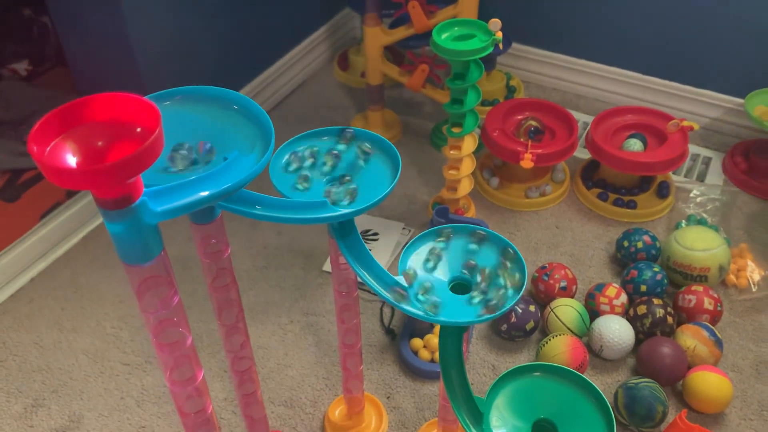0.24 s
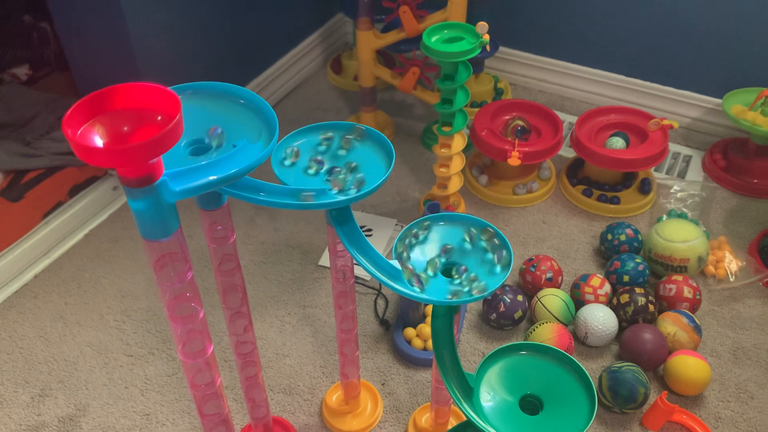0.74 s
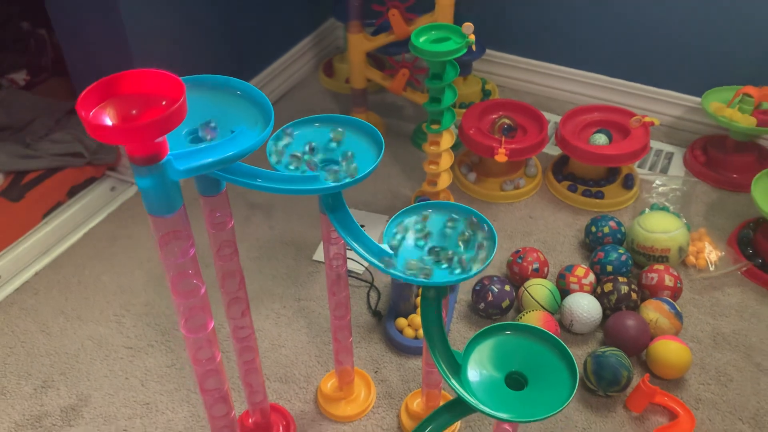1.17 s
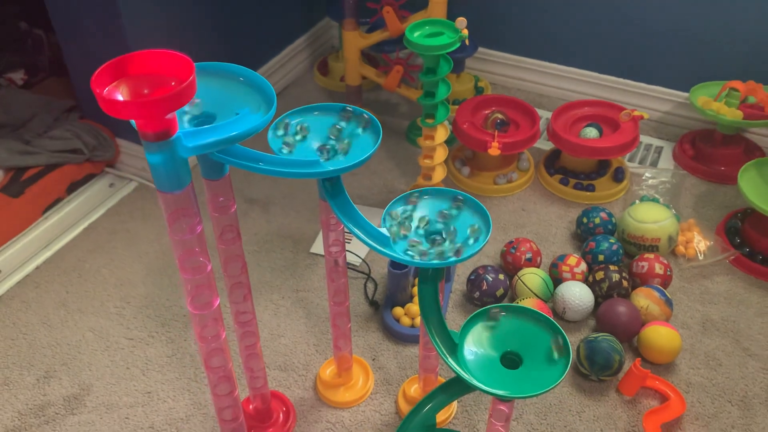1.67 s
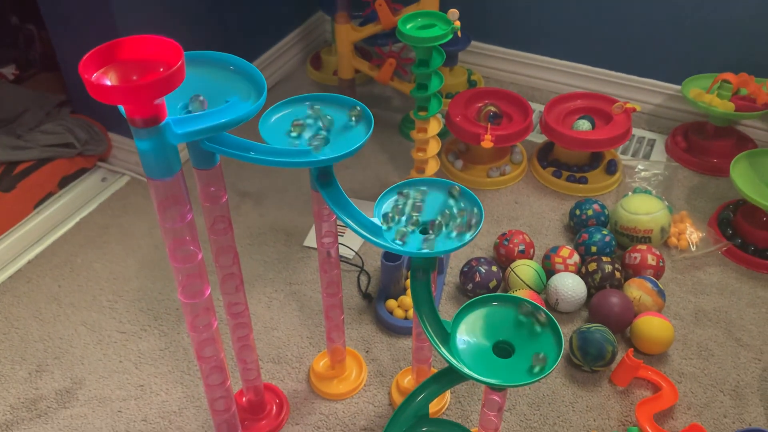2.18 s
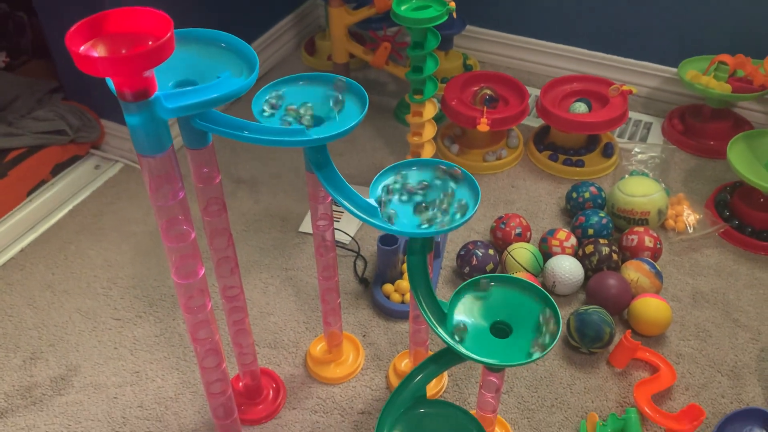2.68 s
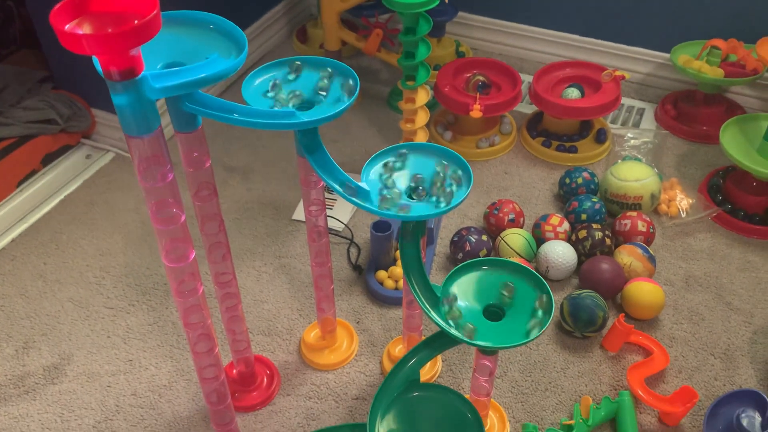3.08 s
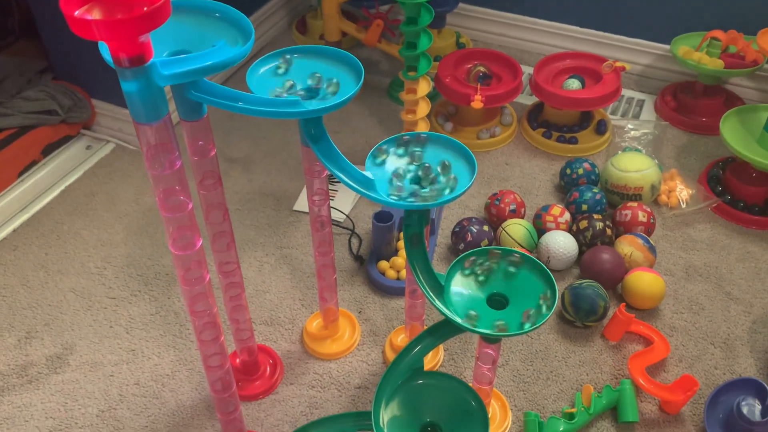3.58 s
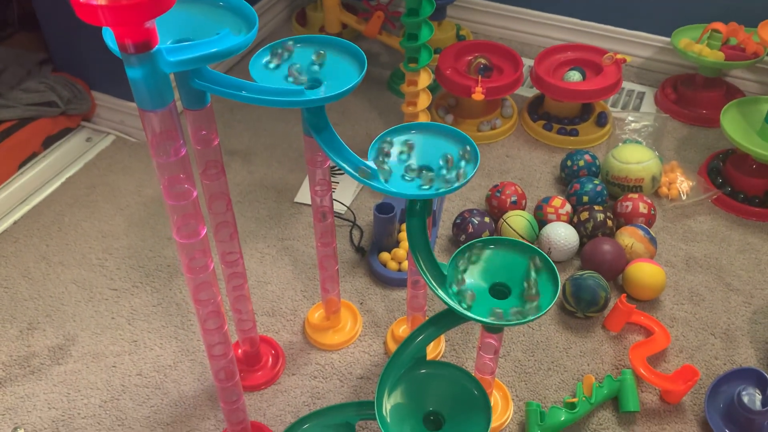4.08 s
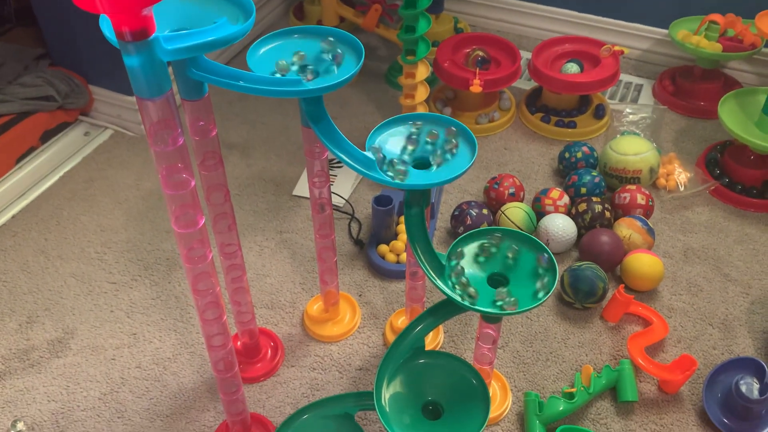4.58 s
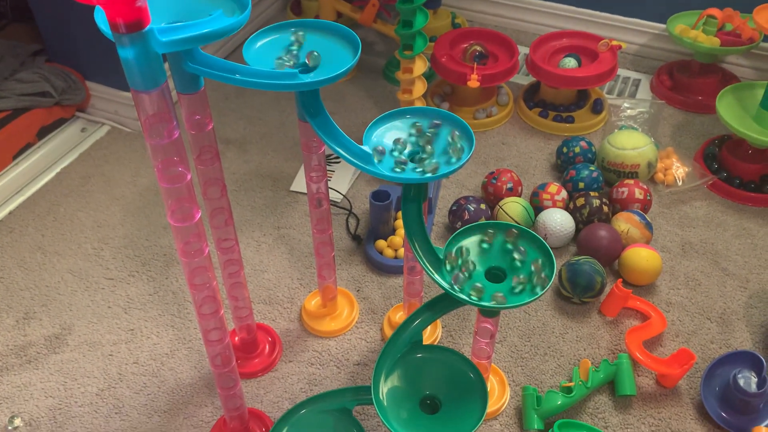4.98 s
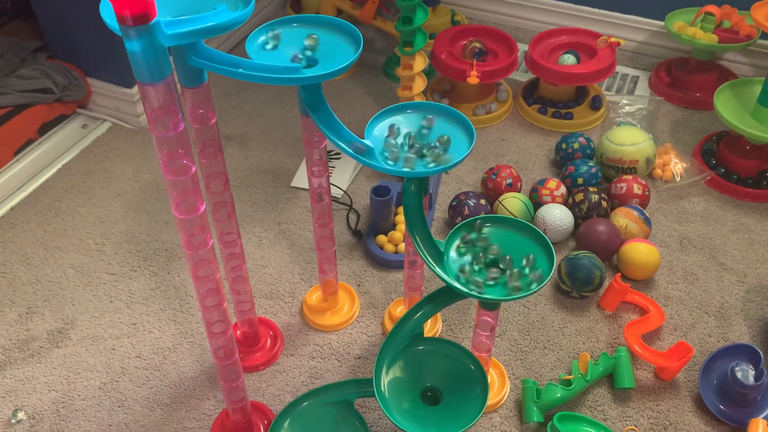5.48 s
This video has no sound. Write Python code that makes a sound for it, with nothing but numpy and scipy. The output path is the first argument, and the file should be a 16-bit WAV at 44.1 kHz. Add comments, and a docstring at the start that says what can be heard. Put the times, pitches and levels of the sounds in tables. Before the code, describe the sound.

A dense, bright clatter of glass marbles runs through a plastic toy track in a quiet carpeted room, heard from nearby. The marbles roll steadily around the funnels the whole time, ticking sharply against one another and striking the plastic with short, hollow knocks. The knocks come in uneven flurries, easing for a moment now and then while the rolling carries on. The sound is dry, with hardly any bass.

```python
"""Sharp clicks and hollow knocks over a steady rolling: glass marbles circle in the plastic funnels of a
toy track, drop from funnel to chute and strike each other. Rolling over ridges excites the plastic
as noise; each drop rings its damped modes and shoves neighbours into a clatter; glass on glass ticks.
The sound reaches the two microphone ports of a nearby camera in a carpeted room."""
import sys
import numpy as np
from scipy import signal
from scipy.fft import rfft, irfft, next_fast_len
from scipy.io import wavfile
from scipy.ndimage import uniform_filter1d, map_coordinates

SR = 44100
rng = np.random.default_rng(int(sys.argv[2]) if len(sys.argv) > 2 else 0)


def persist_wave(psi):
    """Save psi, clipped to +-1, as 16-bit WAV."""
    counts = np.round(np.clip(psi, -1, 1) * 32767).astype(np.int16)
    wavfile.write(sys.argv[1], SR, np.atleast_2d(counts).T)


N = 253134


def amp(db):
    """Decibels as an amplitude ratio."""
    return 10 ** (np.asarray(db) / 20)


def unit_rms(x):
    """Normalisation to an rms of 1."""
    return x / np.sqrt(np.mean(x ** 2) + 1e-20)


def log_interp(points, hz):
    """Interpolation on a logarithmic frequency axis."""
    knots_hz, values = np.transpose(points)
    return np.interp(np.log(hz + 1), np.log(knots_hz + 1), values)


def filtered(x, response):
    """Linear filtering: the spectrum times a frequency response."""
    size = next_fast_len(N + 8192)
    return irfft(rfft(x, size) * response(np.fft.rfftfreq(size, 1 / SR)), size)[..., :N]


def wobble(per_s):
    """Slow modulation: a spline through random knots."""
    return map_coordinates(rng.standard_normal(int(N * per_s / SR) + 4), [np.arange(N) * per_s / SR])


def noise_pair(spectrum):
    """Two uncorrelated shaped noises; patches of the spectrum swell and fade as marbles come and go."""
    cells = signal.stft(rng.standard_normal((2, N + 512)), nperseg=512)[2]
    patches = uniform_filter1d(rng.standard_normal(cells.shape[1:]), size=3, axis=0)
    patches = uniform_filter1d(patches, size=6, axis=1)
    pair = signal.istft(cells * amp(2.22 * unit_rms(patches)), nperseg=512)[1][:, :N]
    return unit_rms(filtered(pair, lambda hz: amp(log_interp(spectrum, hz))))


def bursts(times, level_db, t60):
    """Incoherent summation: an envelope of exponential decays whose powers add."""
    power = np.bincount(np.round(times * SR).astype(int), amp(2 * level_db), N)[:N]
    fall = amp(-120 / (t60 * SR))
    return np.sqrt(signal.lfilter([1], [1, -fall], power))


def swell(envelope, build_s=0.0022):
    """A first-order lag softens the jumps of an envelope."""
    step = 1 / (1 + build_s * SR)
    return signal.lfilter([step], [1, step - 1], envelope)


def contacts(per_s, spread_db, t60):
    """Shot noise: the envelope of many tiny random contacts."""
    when, strength = rng.random((int(per_s * N / SR), 2)).T
    level_db = -spread_db * np.log(strength + 4 / per_s)
    return unit_rms(bursts(when * (N - 1) / SR, level_db, t60))


# likeness of the two ports: (frequency [Hz], coherence [0-1])
PORT_COHERENCE = [(60, .92), (500, .75), (1200, .88), (1750, .5), (2600, .72), (4300, .3), (5900, .3),
                  (7400, .7), (8500, .96), (9700, .75), (10900, .97), (12500, .76), (13400, .95),
                  (14700, .62), (15700, .92)]
# lead of the left port: (frequency [Hz], phase [rad])
PORT_LEAD = [(0, 0), (520, .7), (1200, .2), (1900, .5), (2600, 1.5), (4600, 2.4), (5700, 2.7), (6400, .2),
             (7100, -1.1), (7750, -2.6), (8300, -3.1), (8900, -3.25), (9500, -4.1), (10500, -6),
             (11400, -6.5), (12600, -8.8), (13300, -9.4), (13900, -9.7), (14700, -11.2), (15700, -12.5)]
# left port over right: (frequency [Hz], level difference [dB])
PORT_BALANCE = [(60, 1), (250, -1.5), (420, -1), (800, 3.5), (1200, 3), (2000, 1.5), (3400, 0),
                (5000, -2.5), (7200, 0), (15000, 0)]
SIDE = np.array([[.5], [-.5]])  # left, right


def ports(pair):
    """Diffraction: the camera body delays and shades a (shared, differing) pair into left and right."""
    def path(hz):
        lead = np.interp(hz, *np.transpose(PORT_LEAD))
        return amp(SIDE * log_interp(PORT_BALANCE, hz)) * np.exp(1j * SIDE * lead)

    def angle(hz):
        return np.arccos(log_interp(PORT_COHERENCE, hz)) / 2

    shared = filtered(pair[0], lambda hz: path(hz) * np.cos(angle(hz)))
    differing = filtered(pair[1], lambda hz: path(hz) * np.sin(angle(hz)) * np.sign(SIDE))
    return shared + differing


# low noise of room and towers: (frequency [Hz], relative level [dB])
MURMUR_SPECTRUM = [(25, -28), (60, -14), (120, -11.5), (220, -12), (300, -5), (650, -7), (900, -8.5),
                   (1200, -32)]


def murmur():
    """Forced vibration: the faint murmur of the room and the track's towers swells after each blow."""
    times, db, knock_db = np.transpose(BLOWS)[:3]
    shaken = swell(bursts(times, db + .5 * knock_db - 34.5, t60=0.094))
    return (amp(-65.5 + 0.13 * wobble(6.0)) + shaken) * noise_pair(MURMUR_SPECTRUM)


# modes of funnels and chutes: (frequency [Hz], relative level [dB], decay time T60 [s])
PLASTIC_MODES = [(967, -16, 0.99), (1151, -10, 0.2), (1254, -13, 0.066), (1471, 8.5, 0.22),
                 (1767, -20, 0.17), (2030, -34, 0.047), (2275, -21, 0.073), (2704, 1, 0.63),
                 (2970, -2.5, 0.72), (3090, -22, 0.2), (3310, 2.5, 0.46), (4050, -14, 0.014),
                 (4740, -28, 0.11), (5070, -3, 0.5), (6250, -22, 0.044)]


def plastic_resonance(x, lift_db):
    """Resonance: each mode lifts a peak out of broad noise, narrower the longer it rings."""
    mode_hz, _, t60 = np.transpose(PLASTIC_MODES)[:, :, None]
    width_hz = np.log(1000) / (np.pi * t60)

    def response(hz):
        peaks = np.sum(1 / (1 + (2 * (hz - mode_hz) / width_hz) ** 2), 0)
        return np.sqrt(1 + amp(2 * lift_db) * peaks)

    return unit_rms(filtered(x, response))


# marbles circling: (time [s], rumble level [dB], rattle level [dB])
ROLL_LEVELS = [(0.0, -31, -40), (0.22, -36, -46.5), (1.15, -36, -46), (1.26, -39, -50),
               (1.45, -37.5, -50.5), (2.05, -37.5, -47), (2.17, -37, -45), (2.51, -35.5, -45.5),
               (3.36, -35, -45.5), (3.52, -37, -52), (3.76, -33.5, -43), (3.93, -36.5, -45),
               (4.2, -37, -46), (4.75, -38, -50), (5.07, -38.5, -46.5), (5.21, -36.5, -50),
               (5.51, -39, -47), (5.74, -36.5, -50)]
# marbles nudging each other: (time [s], level [dB])
NUDGE_LEVELS = [(0.0, -49), (0.19, -44), (1.18, -45), (1.34, -52.5), (2.03, -47), (2.17, -46), (2.56, -51),
                (3.04, -45), (3.66, -50), (3.84, -47.5), (5.08, -50), (5.23, -44), (5.48, -49.5),
                (5.74, -45)]
# funnel rumble, slap on plastic and bright glass rattle: (frequency [Hz], relative level [dB])
RUMBLE_SPECTRUM = [(500, -47), (780, -8), (880, -9.5), (960, 0), (1500, 1), (1900, -2), (2700, 1),
                   (3250, 3), (4200, -12), (6800, -17), (9000, -30), (12000, -63)]
SLAP_SPECTRUM = [(2500, -8), (4300, 6.5), (6000, 3.5), (7000, -5), (9000, -42)]
GLASS_SPECTRUM = [(2500, -40), (5000, -29), (6900, -6.5), (8000, -1.5), (12000, -2), (15600, -10.5),
                  (15900, -52), (17000, -64)]


def rolling():
    """Roughness excitation: glass on ridged plastic drives the funnels with countless small bumps."""
    times, rumble_db, rattle_db = np.transpose(ROLL_LEVELS)
    t = np.arange(N) / SR
    rumble = amp(np.interp(t, times, rumble_db) + 0.54 * wobble(25))
    rumble *= contacts(1200, spread_db=1.0, t60=0.032)
    rattle = amp(np.interp(t, times, rattle_db) + 2.5 * wobble(25.56))
    rattle *= contacts(300, spread_db=3.5, t60=0.044)
    nudges = amp(np.interp(t, *np.transpose(NUDGE_LEVELS))) * contacts(250, spread_db=2.5, t60=0.035)
    funnels = plastic_resonance(noise_pair(RUMBLE_SPECTRUM), lift_db=6.0)
    return rumble * funnels + nudges * noise_pair(SLAP_SPECTRUM) + rattle * noise_pair(GLASS_SPECTRUM)


# marbles touching: (time [s], level [dB], relative slap level [dB])
GLASS_TICKS = [(0.0024, -23, -2), (0.022, -26, -4), (0.0384, -27, 2), (0.0972, -25, -22), (0.133, -22, -23),
               (0.1442, -17, -19), (0.1695, -28, -10), (0.1895, -15, -19), (0.2089, -23, -13),
               (0.2468, -33, -5), (0.262, -28, -3), (0.272, -25, -9), (0.2915, -26, 3), (0.3047, -15, -3),
               (0.3684, -24.5, -8), (0.415, -26, -15), (0.452, -29, -6), (0.504, -23, -5),
               (0.5092, -30, -5), (0.5638, -20, 0), (0.6065, -32, 0), (0.634, -26.5, -4), (0.6874, -34, -9),
               (0.6958, -21.5, -3), (0.7547, -19.5, -5.5), (0.8024, -21, -9), (0.8225, -28, -14),
               (0.8343, -25, -5), (0.848, -14, -20), (0.868, -22, -0.5), (0.8874, -20, -10),
               (0.9957, -20, -21), (1.0213, -17, -16), (1.039, -18, -16), (1.053, -26, -14),
               (1.0714, -27, 2), (1.0793, -17.5, -1), (1.1167, -26, -8), (1.1371, -18, -1.5),
               (1.173, -29, -9), (1.186, -18, -19), (1.2106, -22, -13), (1.2494, -13, -8.5),
               (1.2574, -17, -15), (1.4203, -35, -20), (1.4674, -28, -19), (1.513, -34, -15),
               (1.5788, -41, 5), (1.5946, -29, -6), (1.6202, -28, -10), (1.632, -27, -16),
               (1.676, -21, -13), (1.6864, -17, -3), (1.729, -21, -1), (1.7806, -20.5, -17),
               (1.8186, -28, -18), (1.8467, -34, -18), (1.9495, -30, -20), (1.9714, -28, -15),
               (1.9867, -24.5, -5), (2.022, -21.5, -13), (2.057, -23, -16), (2.0796, -15, -11),
               (2.1021, -25, -12), (2.1433, -21, -15), (2.1784, -28, -16), (2.1958, -25, -15),
               (2.2316, -37, -17), (2.2496, -24, -6), (2.2583, -23, -8), (2.2695, -20, -14),
               (2.3128, -19, -3), (2.359, -23, -9), (2.3755, -32, -7), (2.402, -27, -14),
               (2.452, -21.5, -27), (2.5247, -31, -16), (2.5578, -22.5, -25), (2.5887, -20.5, -25),
               (2.6135, -28, -19), (2.7147, -40, -5), (2.7292, -32, -7), (2.7473, -21, -4),
               (2.753, -19, -7), (2.7886, -30, -17), (2.801, -18.5, -13), (2.8537, -22, -5),
               (2.866, -17.5, -12), (2.95, -22, -15), (3.0033, -14.5, -8), (3.074, -36, -7),
               (3.106, -38, -7), (3.14, -19.5, -14), (3.18, -12.5, -9), (3.238, -24, -13),
               (3.254, -11, -17), (3.3278, -21.5, -26), (3.3513, -21, -15), (3.3702, -31, -17),
               (3.4072, -24, -24), (3.4357, -27, -18), (3.467, -34, -15), (3.5675, -19, -31),
               (3.683, -25, -15), (3.696, -31, -17), (3.7204, -21, -11), (3.7559, -26, -1),
               (3.772, -20, -5), (3.8094, -28, -1), (3.8305, -20, -2.5), (3.8444, -30, 2),
               (3.8977, -22, -3.5), (3.9275, -26, -19), (3.9424, -45, -18), (3.9582, -16.5, -18),
               (4.0003, -27, -22), (4.0153, -22.5, -20), (4.0654, -26, -11), (4.0811, -26, -18),
               (4.1045, -24, -12), (4.1395, -34, -13), (4.145, -28, -17), (4.1904, -29, -19),
               (4.2208, -45, -11), (4.2637, -33, -17), (4.3191, -33, -5), (4.367, -24, -24),
               (4.4189, -30, -10), (4.4628, -22, -23), (4.4824, -31, -15), (4.5351, -8.5, -19),
               (4.6004, -24, -14), (4.623, -27, -26), (4.749, -36, -5), (4.78, -34, -6),
               (4.8316, -23.5, -10), (5.004, -27, -18), (5.0285, -30, -20), (5.049, -32, -4),
               (5.0654, -23, -4), (5.093, -19, -9), (5.1105, -18.5, -7), (5.1482, -23, -7),
               (5.1685, -17, -16), (5.1983, -22, -10), (5.2377, -21, -5), (5.2928, -22, 2),
               (5.3268, -32, -17), (5.3383, -21, -22), (5.3514, -23, -6), (5.379, -22, -18),
               (5.4071, -32, -16), (5.4291, -26, -8), (5.467, -24.5, -27), (5.5004, -27, -17),
               (5.539, -27, -9), (5.5563, -19.5, -19), (5.5752, -24, -20), (5.5952, -35, -11),
               (5.6281, -20.5, -5.5), (5.677, -20.5, 2), (5.7023, -19, -4), (5.7284, -14, -8)]


def glass_ticks():
    """Hard contact is brief, hence bright: glass clicks on glass, with a duller plastic slap under it."""
    times, db, slap_db = np.transpose(GLASS_TICKS)
    tilt_db = 2 * np.tanh(rng.standard_normal(len(times)))  # some ticks sharper, some duller
    glass = noise_pair(GLASS_SPECTRUM)
    lower = filtered(glass, lambda hz: 1 / (1 + (hz / 10500) ** 8))
    upper = glass - lower

    def click(level_db):
        return bursts(times, level_db - 6, t60=.008) + bursts(times, level_db - 13, t60=0.057)

    slap = bursts(times, db + slap_db - 0.5, t60=0.029) * noise_pair(SLAP_SPECTRUM)
    return click(db - tilt_db) * lower + click(db + tilt_db) * upper + slap


def ring(hz, level_db, t60, t, detune=0.0087, uneven_db=2.5, shared_rad=0.53, differing_rad=3.9):
    """Modal superposition: a pair of damped sine sums, with random spread in level, pitch and phase."""
    draw = rng.standard_normal((4, len(hz), 1))
    rise = 1 - np.exp(-t / .0006)
    envelope = amp(level_db + uneven_db * draw[0] - 60 * t / t60) * rise
    phase = 2 * np.pi * hz * (1 + detune * draw[1]) * t
    shared = np.sum(envelope * np.sin(phase + shared_rad * draw[2]), 0)
    differing = -np.sum(envelope * np.cos(phase + differing_rad * draw[3]), 0)
    return np.array([shared, differing])


def favour(hz, centre_hz, width):
    """Selective excitation: where a blow lands decides which modes ring most."""
    return np.exp(-(np.log(hz / centre_hz) / width) ** 2)


# modes of the entry cup: (frequency [Hz], relative level [dB], decay time T60 [s])
CUP_MODES = [(963, -8.5, 0.084), (1474, -4, 0.025), (2105, -11.5, 0.053), (2710, -16, 0.033),
             (3183, -6, 0.052), (3267, -13, 0.13), (3570, -9, 0.032), (3697, -8.5, 0.089),
             (4420, -21, 0.042), (5170, -15.5, 0.076), (4990, -12, 0.076), (6200, -34, 0.05),
             (6710, -27, 0.05)]
CUP_BELOW_HZ = 1000  # a blow whose low mode lies below this lands in the cup


def cup_knock(high_hz, t):
    """Free vibration of the hollow entry cup, with modes near high_hz favoured."""
    hz, db, t60 = np.transpose(CUP_MODES)[:, :, None]
    db = db + 5 * favour(hz, high_hz, 0.02)
    return amp(-4) * ring(hz, db, t60, t, detune=.003, uneven_db=1.5, shared_rad=.3, differing_rad=.7)


def track_knock(knock_db, low_hz, high_hz, clatter_db, t):
    """Impulse response: the struck spot gives a heavily damped clack, then the whole part rings on."""
    spot_hz, spot_db = high_hz * np.array([[.86], [1], [1.05]]), np.array([[-6], [1], [-5]])
    clack = ring(spot_hz, spot_db, .014, t, detune=.003, uneven_db=1, shared_rad=.15, differing_rad=.3)
    knock = ring(np.array([[low_hz]]), knock_db, 0.025, t, uneven_db=1.05, differing_rad=1.0)
    hz, db, t60 = np.transpose(PLASTIC_MODES)[:, :, None]
    db = db + 8 * (favour(hz, low_hz, 0.011) + favour(hz, high_hz, 0.094))
    db += np.where(hz < 1900, knock_db + 0.5, 0)
    loaded_t60 = 0.33 * t60  # the load of marbles damps the part
    return clack + knock + amp(clatter_db - 10.5) * ring(hz, db, loaded_t60, t, detune=0.019)


def ringing(hits):
    """Impact excitation: each hit rings the cup or the track, plus four random upper modes."""
    pair, t = np.zeros((2, N + SR)), np.arange(SR // 10) / SR
    for time, db, knock_db, _, low_hz, high_hz, clatter_db in hits:
        pings = ring(rng.uniform(4085, 7600, (4, 1)), level_db=-21.5, t60=.045, t=t)
        if low_hz < CUP_BELOW_HZ:
            knock = cup_knock(high_hz, t)
        else:
            knock = track_knock(knock_db, low_hz, high_hz, clatter_db, t)
        start = round(time * SR)
        pair[:, start:start + len(t)] += amp(db) * (pings + knock)
    return pair[:, :N]


# loose parts shaken by a hit: (frequency [Hz], relative level [dB])
CLATTER_SPECTRUM = [(500, -52), (850, -16), (1000, 0), (1500, -3), (1900, -2), (2500, -2.5), (3000, 2.5),
                    (3350, 6.5), (3800, -6.5), (4500, -17.5), (6800, -17), (9000, -27), (12000, -56)]


def clatter(hits):
    """Secondary collisions and reflections: loose parts and near walls answer each hit with noise."""
    times, db, _, sizzle_db, low_hz, _, clatter_db = np.transpose(hits)
    tail_db = db + clatter_db - 2 * (low_hz < CUP_BELOW_HZ)  # fewer neighbours rattle in the cup
    jostle = contacts(300, spread_db=0.5, t60=0.16)  # shoved neighbours make the tail lumpy
    plastic = plastic_resonance(noise_pair(CLATTER_SPECTRUM), lift_db=2.0)
    body = swell(bursts(times, tail_db - 1.5, t60=0.23)) * plastic
    slap = swell(bursts(times, tail_db - 4, t60=0.2)) * noise_pair(SLAP_SPECTRUM)
    sizzle = swell(bursts(times, sizzle_db - 6, t60=0.13)) * noise_pair(GLASS_SPECTRUM)
    return jostle * (body + slap) + sizzle


def light_taps(per_s=3.2):
    """A random point process: soft hits whose level follows the rumble, as rows like those of BLOWS."""
    when, strength, low, high = rng.random((int(per_s * N / SR), 4)).T
    times = when * (N - 1) / SR
    rumble_db = np.interp(times, *np.transpose(ROLL_LEVELS)[:2])
    db = rumble_db - 5.5 + 0.5 * np.log(strength + 0.056)
    columns = np.broadcast_arrays(times, db, -6, db - 18, 1050 + 650 * low, 2300 + 1100 * high, -12)
    return np.transpose(columns)


def blow_pan(cup_left_db=3.5, scatter_db=0.8):
    """Level difference, held from blow to blow: the cup is to the left, the rest near the middle."""
    times, low_hz = np.transpose(BLOWS)[[0, 4]]
    pan_db = np.where(low_hz < CUP_BELOW_HZ, cup_left_db, scatter_db * rng.standard_normal(len(times)))
    latest = np.clip(np.searchsorted(times, np.arange(N) / SR) - 1, 0, None)
    return amp(uniform_filter1d(pan_db[latest], size=64) * SIDE)


# marbles striking plastic: (time [s], level [dB], relative knock level [dB], sizzle level [dB],
# favoured low mode [Hz], favoured high mode [Hz], relative clatter level [dB])
BLOWS = [(0.039, -20.5, -4.5, -41, 1070, 2440, -21), (0.146, -37, -14, -32, 1300, 3160, -2),
         (0.169, -13.5, -4.5, -24.5, 1580, 2420, -10.5), (0.207, -19.5, -7, -33, 1290, 3060, -11.5),
         (0.263, -22.5, -8, -30, 1300, 3120, -13), (0.305, -10, -20, -39, 956, 3210, -16),
         (0.372, -19, -14, -49, 985, 3120, -21), (0.416, -24, -15, -34, 950, 3250, -16),
         (0.5032, -10.5, -17, -21, 958, 3170, -16), (0.509, -20, -13, -35, 958, 3170, -16),
         (0.564, -14.5, -18, -31, 961, 3170, -11), (0.659, -24, -2.5, -27, 1020, 2910, -9),
         (0.697, -15.5, -6.5, -24, 1560, 2390, -11), (0.756, -20.5, -12, -40, 1140, 2540, -26),
         (0.801, -23, -4, -40, 1006, 2250, -9), (0.863, -15, -4.5, -23.5, 1070, 2490, -11.5),
         (1.001, -19.5, -7, -34, 1790, 2700, -10), (1.021, -26, -7, -33, 1150, 3140, -16),
         (1.046, -29.5, -1, -30, 1280, 3120, -4), (1.0804, -7.5, -16.5, -23, 1320, 3110, -23),
         (1.092, -18, -20, -40, 1280, 2680, -20), (1.1379, -10.5, -23, -28, 1290, 3200, -24),
         (1.173, -22.5, -9, -39, 1670, 3030, -14), (1.202, -25, -18, -26, 1290, 3080, -10),
         (1.214, -19, -17, -26, 1110, 3230, -11.5), (1.251, -8.5, -11, -20, 1350, 3050, -19),
         (1.257, -15, -26, -36, 1470, 3100, -14.5), (1.282, -16, -19, -36, 1670, 3240, -24),
         (1.608, -28.5, 0.5, -38, 1080, 3230, -6.5), (1.622, -25, -6, -27.5, 1280, 3030, -17),
         (1.668, -26.5, -3, -35, 1330, 2650, -8.5), (1.686, -13, -5, -17, 1104, 2460, -10),
         (1.72, -15, -3.5, -20, 1560, 2800, -13), (1.729, -16, -8, -27, 1480, 3150, -14),
         (1.738, -20, -1.5, -28, 1400, 2590, -11), (1.78, -15, -7, -31, 1180, 3140, -14),
         (1.999, -22, -8, -33, 1190, 2800, -9.5), (2.022, -28, -3, -30, 1200, 2850, -5.5),
         (2.046, -29.5, -12, -26, 1250, 2480, 0.5), (2.081, -9, -11.5, -25, 1270, 3260, -17.5),
         (2.09, -17, -7, -30, 1270, 2870, -14), (2.102, -20, -5, -18.5, 1270, 3150, -5.5),
         (2.1255, -15, -13, -28, 1410, 3300, -14), (2.143, -15, -10, -27, 1460, 3020, -13.5),
         (2.196, -23.5, -16, -38, 1210, 2800, -11), (2.249, -20, -9, -34, 1400, 3200, -13),
         (2.271, -20, -22, -29, 1260, 3130, -8.5), (2.313, -9.5, -13, -26, 1390, 3240, -16.5),
         (2.3265, -12, -16, -34, 956, 2690, -20), (2.359, -14, -11, -44, 1260, 3270, -18.5),
         (2.376, -15.5, -23, -33, 958, 3680, -16), (2.57, -24.5, -19, -43, 1280, 3380, -14),
         (2.59, -24.5, -16, -39, 1240, 2320, -20), (2.729, -26, -25, -30, 1280, 3500, -11),
         (2.748, -15, -10, -28, 1440, 3200, -11), (2.754, -14, -18, -36, 1550, 2670, -24),
         (2.801, -15, -8, -24, 1550, 3180, -15.5), (2.827, -21.5, -13, -35, 1230, 3180, -14),
         (2.866, -18.5, -1.5, -23.5, 1560, 2430, -9.5), (2.926, -25.5, -6, -35, 1210, 2970, -11),
         (2.962, -23, -8, -25.5, 1130, 2820, -8.5), (3.003, -9, -16, -19, 1530, 3200, -19.5),
         (3.014, -20.5, -16, -38, 1520, 3380, -10), (3.0423, -14.5, -15, -35, 1570, 3200, -22),
         (3.031, -19, -14, -45, 1500, 3300, -18), (3.075, -19.5, -16, -50, 1580, 3260, -21),
         (3.146, -25, -8, -22.5, 1240, 3030, -13), (3.18, -11.5, -5, -24, 1250, 3270, -14.5),
         (3.253, -17, -5, -22, 1280, 3140, -10), (3.288, -23.5, -1, -25, 1590, 2800, -6),
         (3.352, -18.5, -5.5, -26, 1130, 2980, -11.5), (3.424, -25, -3, -31, 1300, 2340, -14),
         (3.444, -24.5, -12, -25, 1360, 3070, -4), (3.467, -12.5, -15, -22, 1480, 3070, -14),
         (3.499, -16.5, -7, -30, 1700, 3140, -15.5), (3.696, -24.5, -6, -26, 1440, 3200, -5),
         (3.77, -13.5, -13, -23.5, 1300, 3210, -12), (3.808, -15.5, -14, -37, 1630, 3190, -12),
         (3.828, -18.5, -10, -30, 1090, 3060, -21), (3.9, -25.5, -1, -30, 1150, 3200, -10.5),
         (3.958, -22.5, -6, -36, 1750, 3000, -12.5), (4.066, -24.5, -0.5, -34, 1330, 2340, -10),
         (4.082, -25.5, -2, -30, 1290, 3120, -7), (4.106, -21, -15, -31, 1150, 3500, -13),
         (4.139, -17, -5, -21, 1570, 3170, -9), (4.157, -17, -9, -35, 1430, 3300, -22),
         (4.171, -16, -22, -42, 1190, 3280, -22), (4.187, -23, -14, -50, 1300, 3270, -32),
         (4.314, -32, -8, -41, 1270, 3300, -2), (4.457, -28.5, -4, -26.5, 1190, 3000, -4),
         (4.481, -25, -8, -28, 1230, 2300, -8), (4.536, -11, -11.5, -20, 1400, 3130, -17),
         (4.545, -29, -11, -43, 1380, 3300, -13), (4.571, -19, -9, -40, 1580, 3260, -12),
         (4.601, -21.5, -14, -34, 1450, 3300, -22), (4.833, -24.5, -4, -29.5, 1520, 3050, -14),
         (4.857, -30.5, 0, -34, 1146, 2950, -4.5), (5.049, -28, -3.5, -28, 1240, 3040, -6),
         (5.066, -26, -17, -27, 1740, 3170, -7.5), (5.091, -25, -9, -40, 1720, 3170, -7),
         (5.109, -12, -9.5, -24, 1395, 3300, -15), (5.169, -15, -6.5, -24.5, 1260, 3300, -12),
         (5.179, -20.5, -3, -31, 1510, 2860, -12.5), (5.202, -23, -17, -29, 1350, 3620, -19),
         (5.234, -21.5, -4, -27, 1070, 3180, -5), (5.245, -19.5, -6, -27, 1080, 2150, -10),
         (5.292, -23, -5, -30, 1060, 3600, -8), (5.299, -20, -20, -41, 1290, 3300, -25),
         (5.35, -26, 0, -44, 1070, 3360, -11), (5.379, -26, -4, -27, 1130, 3130, -6),
         (5.557, -22, -3.5, -45, 1700, 3100, -15), (5.575, -28, -2, -54, 1740, 3320, -9),
         (5.632, -25.5, -9, -26, 1300, 3100, -3), (5.644, -20.5, -18, -25, 1220, 3030, -12),
         (5.659, -24, -4, -30, 1330, 3200, -18), (5.676, -10.5, -3.5, -25, 1850, 3500, -17),
         (5.687, -14, -7, -36, 1720, 3500, -17), (5.704, -18.5, -11.5, -23, 1730, 3100, -10),
         (5.728, -7, -10.5, -25.5, 1310, 3250, -16)]


def marble_blows():
    """Impact sound: blows and light taps each give modal ringing and noisy clatter."""
    hits = np.vstack([BLOWS, light_taps()])
    return blow_pan() * ports(ringing(hits) + clatter(hits))


def shell_radiation(x, cutoff_hz=850):
    """Radiation efficiency: small thin shells give off hardly any bass."""
    highpass = signal.butter(8, 2 * np.pi * cutoff_hz, "high", analog=True)
    return filtered(x, lambda hz: signal.freqs(*highpass, 2 * np.pi * hz)[1])


def scene():
    """Superposition of the marbles and the low murmur at the two ports."""
    marbles = ports(rolling() + glass_ticks()) + marble_blows()
    return shell_radiation(marbles) + ports(murmur())


def record(dry):
    """Band limiting: the camera passes nothing above its top frequency."""
    return filtered(dry, lambda hz: hz < 16650)


dry = scene()
out = record(dry)
persist_wave(out)
```